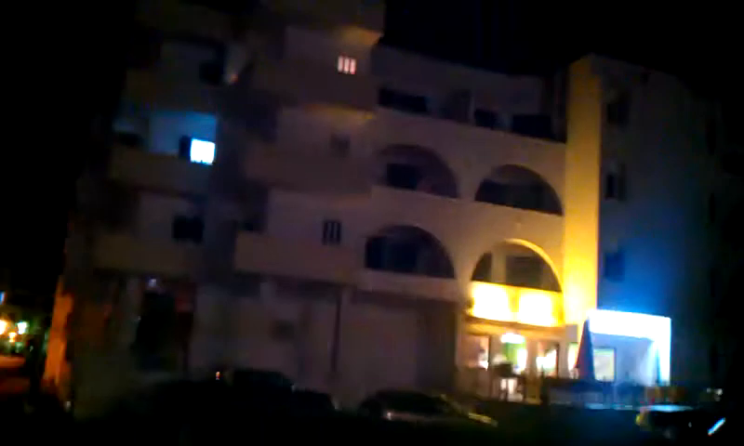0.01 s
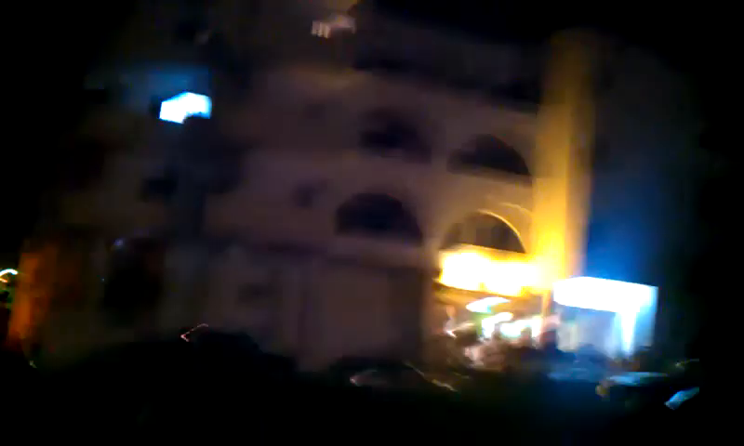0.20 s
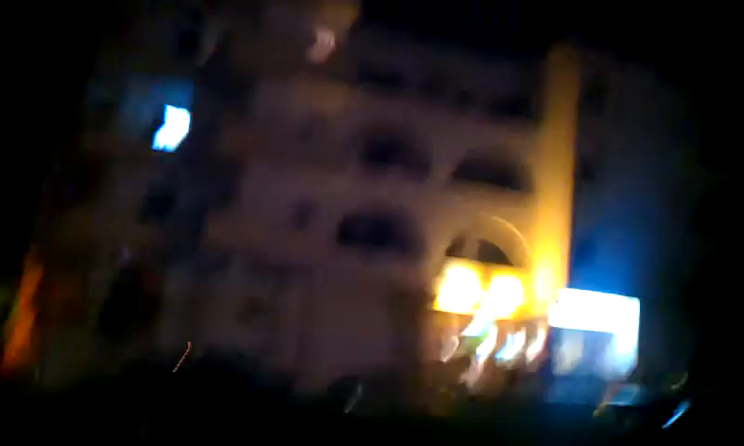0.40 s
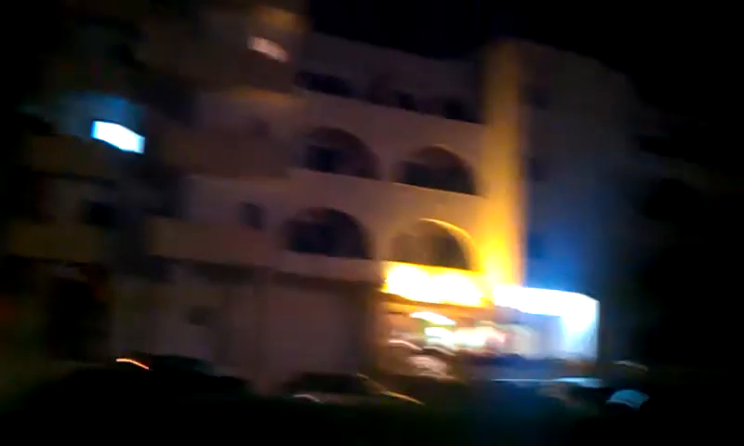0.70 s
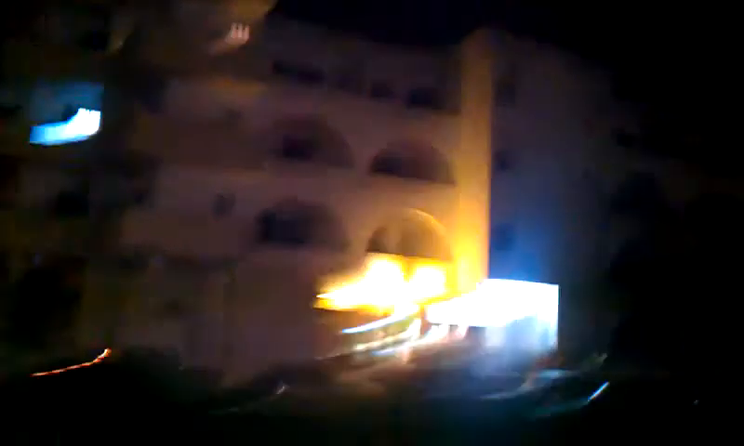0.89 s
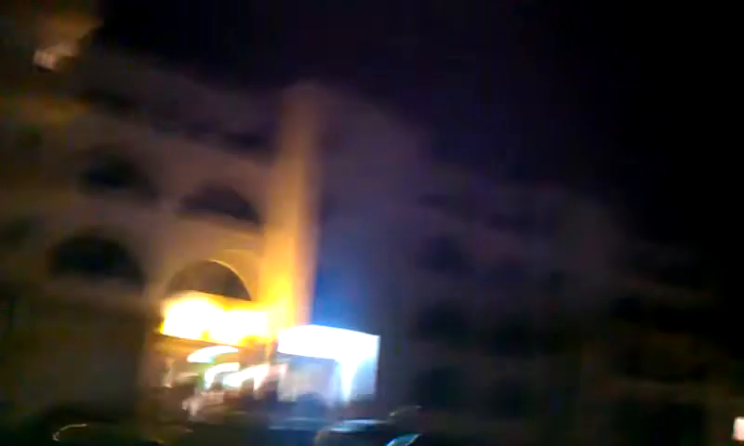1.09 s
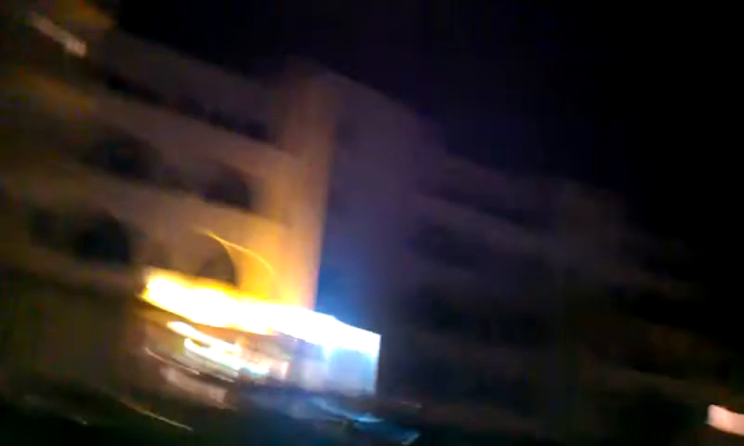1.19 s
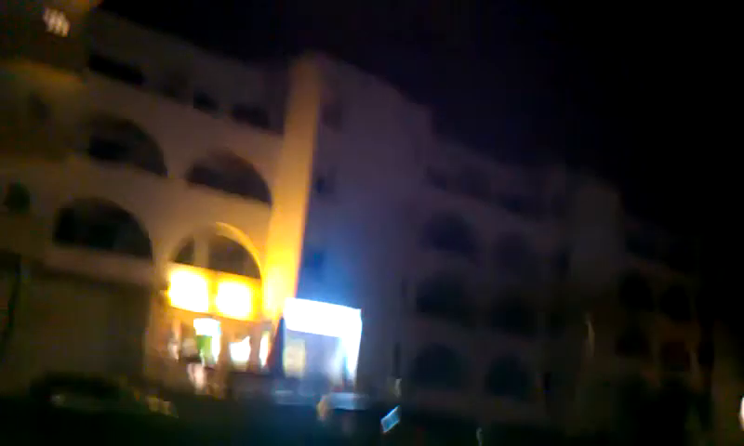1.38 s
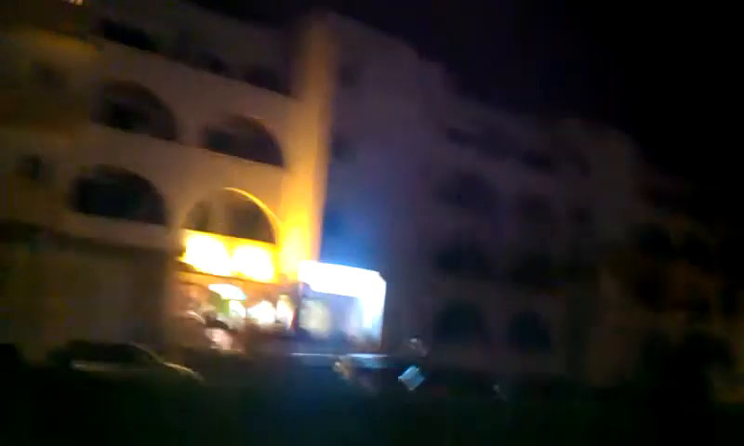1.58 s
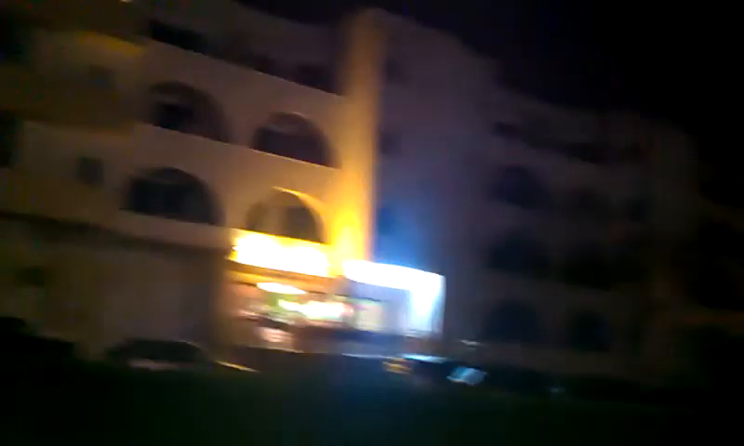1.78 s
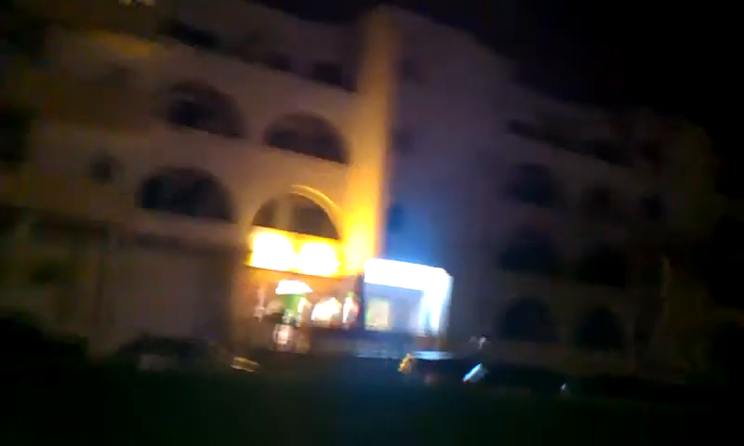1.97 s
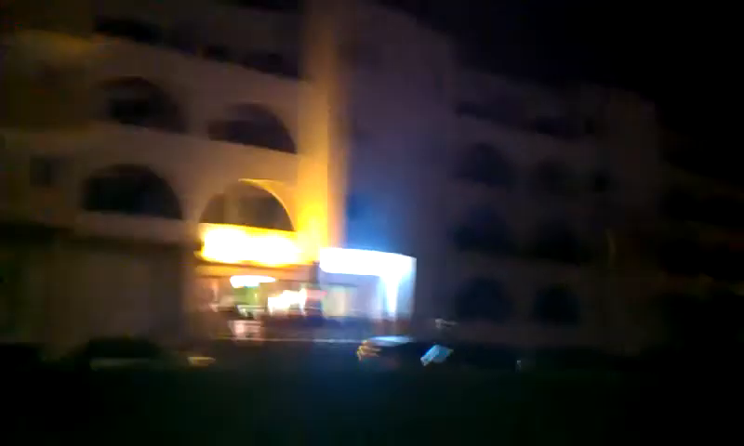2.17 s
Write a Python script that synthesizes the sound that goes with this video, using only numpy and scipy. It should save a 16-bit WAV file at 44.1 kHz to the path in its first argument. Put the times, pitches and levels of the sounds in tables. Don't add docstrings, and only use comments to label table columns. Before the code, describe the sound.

Continuous high, fast-pulsing cricket song outdoors at night over soft town wash and mono microphone hiss; fingers on the camera shell make sharp early snaps, sparse ticks, then a late crackling cluster.

```python
import sys
import numpy as np
from scipy import signal
from scipy.fft import rfft, irfft
from scipy.io import wavfile
from scipy.ndimage import uniform_filter1d

SR = 44100
rng = np.random.default_rng(int(sys.argv[2]) if len(sys.argv) > 2 else 0)


def store_wav(level_fs):
    pcm = np.round(np.clip(np.atleast_2d(level_fs), -1, 1) * 32767)
    wavfile.write(sys.argv[1], SR, pcm.T.astype(np.int16))


def invert_db(level):
    return 10 ** (np.asarray(level, dtype=float) / 20)


N = 97020


def curve(table):
    return np.interp(np.arange(N) / SR, *np.array(table, float).T[:2])


def unit(x):
    return x / np.sqrt(np.mean(x ** 2))


def ring(x, hz, width_hz):
    return signal.lfilter(*signal.iirpeak(hz, hz / width_hz, fs=SR), x)


def ringing_noise(hz, width_hz, second_hz, second_width_hz):
    return unit(ring(ring(rng.standard_normal(N), hz, width_hz), second_hz, second_width_hz))


def walk(rate):
    hold = int(SR / rate)
    steps = np.repeat(rng.standard_normal(N // hold + 1), hold)
    return 1.6 * uniform_filter1d(uniform_filter1d(steps, hold), hold)[:N]


def add(out, s, sound, db):
    i = int(s * SR)
    out[i:i + len(sound)] += (invert_db(db) * sound / np.abs(sound).max())[:N - i]


def trill(beat, wing_hz, pulse_s, scatter_hz):
    edge_s, jitter_s = .0035, .00004
    length_scatter, level_scatter_db = .11, 1.0
    sag_hz_per_s = -3500
    t = np.arange(N) / SR
    stroke = np.round(beat).astype(int)
    chance = rng.standard_normal((120, 4))
    centre = np.interp(np.arange(120), beat, t) + jitter_s * chance[:, 0]
    u = t - centre[stroke]
    half = pulse_s / 2 * (1 + length_scatter * chance[stroke, 1])
    shape = np.sin(np.pi / 2 * np.clip((half - np.abs(u)) / edge_s + .5, 0, 1)) ** 2
    turns = (wing_hz + scatter_hz * chance[stroke, 2]) * u + sag_hz_per_s / 2 * u ** 2
    return unit(shape * invert_db(level_scatter_db * chance[stroke, 3]) * np.sin(2 * np.pi * turns))


def near_cricket():
    # t/s, lead over an even beat [strokes]
    stroke_drift = [(0, .1), (.2, 0.095), (.3, 0.013), (.7, -0.16), (1.0, -0.1), (1.1, 0.0043), (1.5, .08),
                    (1.7, -0.034), (1.9, 0.068), (2.2, -0.066)]
    # t/s, level/dB
    song_level = [(0, -54), (.3, -52.5), (.5, -53.5), (.7, -52), (.77, -55), (1.0, -54.5), (1.2, -53),
                  (1.31, -54), (1.42, -51.5), (1.62, -54), (1.76, -52), (1.82, -53), (2.0, -57), (2.2, -52)]
    stroke_hz, first_stroke = 42.0715, -.238
    echo_s, echo_db = .012, -11
    beat = stroke_hz * np.arange(N) / SR + first_stroke + curve(stroke_drift)
    song = trill(beat, wing_hz=3200, pulse_s=.0095, scatter_hz=9)
    walls = rng.standard_normal(4000) * np.exp(-np.arange(4000) / SR / echo_s)
    echo = unit(signal.fftconvolve(song, walls)[:N])
    return (song + invert_db(echo_db) * echo) * invert_db(curve(song_level))


def far_cricket():
    # t/s, level/dB
    far_level = [(0, -65), (.3, -67), (.5, -65.5), (.85, -66.5), (1.3, -68), (1.7, -67.5), (2.2, -67)]
    stroke_hz, first_stroke, wing_hz = 49.15, .052, 3534
    blur_db = 0.5
    beat = stroke_hz * np.arange(N) / SR + first_stroke + 0.0536 * walk(6.6)
    strokes = trill(beat, wing_hz, pulse_s=0.005, scatter_hz=41.2)
    blur = ringing_noise(wing_hz - 60, 430, wing_hz - 60, 400)
    return (strokes + invert_db(blur_db) * blur) * invert_db(curve(far_level))


def ticks():
    # t/s of the peak, peak level/dB, ring f/Hz, share of the shell's lower ring/dB
    tick_events = [(0.0077, -27.5, 8000, -35), (0.0133, -29.5, 7060, -16.5), (0.046, -34.5, 6700, -31),
                   (0.0494, -38, 8600, -23), (0.1034, -39, 8000, -17), (0.2022, -32.5, 8400, -14),
                   (0.8511, -36, 7200, -23), (0.922, -32.5, 7130, -25), (1.1595, -32.5, 8350, -36),
                   (1.2604, -36, 7400, -20), (1.306, -33.5, 8300, -26), (1.3149, -28, 7700, -9.5),
                   (1.3563, -42, 8700, -12), (1.423, -32, 7660, -7), (1.4515, -39, 8800, -7),
                   (1.821, -25.5, 7150, -13.5), (1.8238, -36, 8040, -4), (1.836, -36, 8100, -20),
                   (1.8526, -27, 8000, -27), (1.8608, -42, 8700, -14), (1.8749, -24.5, 6600, -9),
                   (1.8812, -20.5, 7450, -20), (1.8854, -39, 7100, -11), (1.9064, -34, 8000, -12),
                   (1.9101, -32, 7800, -5), (1.9383, -29, 7600, -21), (1.9425, -27.5, 7400, -34),
                   (2.002, -33.5, 8100, -14), (2.0178, -35, 8100, -19), (2.0515, -39, 7150, -1.5)]
    decay_ms, port_width_hz = .7, 1600
    shell_hz, shell_width_hz = 4200, 1800
    out = np.zeros(N)
    ms = np.arange(300) / SR * 1000
    for s, db, hz, shell_db in tick_events:
        scrape = rng.standard_normal(len(ms)) * np.exp(-ms / decay_ms)
        port = ring(ring(scrape, hz, port_width_hz), hz, 2800)
        shell = ring(ring(scrape, shell_hz, shell_width_hz), shell_hz, 6000)
        start = s - .0003
        add(out, start, port, db)
        add(out, start, shell, db + shell_db + 7)
    return out


def snaps():
    # t/s, peak level/dB, ring f/Hz, ring t60/ms
    snap_events = [
        (.2251, -15.5, 8000, 7.6),
        (.2446, -3, 7600, 1.1),
    ]
    broad_db = -1.5
    out, push = np.zeros(N), signal.unit_impulse(3000)
    for s, db, hz, ms in snap_events:
        click = ring(ring(ring(push, hz, 8000), hz, 8000), hz, 10000)
        add(out, s, ring(click, hz, 2200 / ms) * 3 + invert_db(broad_db) * click, db)
    return out


def knocks():
    # t/s, peak level/dB, ring f/Hz, ring t60/ms
    knock_events = [(.2252, -31.5, 910, 9.6), (0.225, -38, 3040, 1.6), (.2447, -33.5, 770, 4.1),
                    (.896, -39, 727, 11), (.896, -35.5, 1990, 4.6), (1.7974, -35, 705, 4.7),
                    (1.800, -39.5, 350, 11)]
    out, push = np.zeros(N), signal.unit_impulse(3000)
    for s, db, hz, ms in knock_events:
        body = ring(push, hz, 2200 / ms)
        add(out, s, ring(ring(body, hz, 4.4 * hz), hz, 2 * hz), db)
    return out


def thumps():
    # t/s, peak level/dB, swing f/Hz
    jolts = [(0.2245, -47.5, 110), (.244, -43, 150), (0.247, -54, 30), (0.422, -48.5, 75)]
    out, push = np.zeros(N), signal.unit_impulse(3000)
    for s, db, hz in jolts:
        add(out, s, ring(ring(push, hz, hz), hz, 2 * hz), db)
    return out


def rubbing():
    # t/s, level/dB
    rub_level = [(0, -55), (.07, -66), (.195, -60), (.228, -52), (.2435, -36), (.246, -65), (1.24, -60),
                 (1.265, -55.5), (1.33, -57), (1.46, -60), (1.795, -71), (1.815, -44), (1.89, -47),
                 (1.955, -54), (1.97, -67), (2.05, -48), (2.07, -66), (2.2, -60)]
    grains_per_s, spread_db, uneven_db = 3900, 2, 2.5
    port_hz, port_width_hz, body_db = 7900, 1530, -3
    grains = (rng.random(N) < grains_per_s / SR) * invert_db(spread_db * rng.exponential(size=N))
    friction = signal.lfilter([1], [1, -.95], grains) * rng.standard_normal(N)
    port = ring(ring(friction, port_hz, port_width_hz), port_hz, 4000)
    shell = ring(ring(friction, 4530, 6400), 4400, 9000) + 0.88 * ring(friction, 1580, 2100)
    return unit(port + invert_db(body_db) * shell) * invert_db(curve(rub_level) + uneven_db * walk(80))


def car():
    # t/s, level/dB of the tyres
    car_fade = [(0, -52), (.3, -58), (.6, -68.5), (1.2, -71), (2.2, -71)]
    tyres = ringing_noise(1350, 680, 1350, 1360)
    engine = ringing_noise(620, 230, 600, 530)
    return tyres * invert_db(curve(car_fade)) + engine * invert_db(curve(car_fade) - 6.5)


def town():
    # f/Hz, level/dB per Hz
    town_colour = [(30, -8), (58, -4), (260, -1), (420, -6), (1200, -9), (2700, -14.5), (4800, -10),
                   (16000, -28.5)]
    town_db, swell_db, flicker_db = -51.5, .25, .5
    f = np.fft.rfftfreq(N, 1 / SR) + 1
    hz, db = np.transpose(town_colour)
    wash = rfft(rng.standard_normal(N)) * invert_db(np.interp(np.log(f), np.log(hz), db))
    out, swell = np.zeros(N), walk(4.5)
    place = 2 * np.log2(f / 20)
    for band in range(21):
        share = np.clip(1 - np.abs(place - band), 0, 1)
        out += irfft(wash * share, N) * invert_db(swell_db * swell + flicker_db * walk(8.72))
    return unit(out) * invert_db(town_db)


def port_hiss():
    hiss_db, flicker_db = -58, .5
    return ringing_noise(8000, 1680, 8000, 3360) * invert_db(hiss_db + flicker_db * walk(6.7))


def scene():
    crickets = near_cricket() + far_cricket()
    handling = ticks() + snaps() + knocks() + thumps() + rubbing()
    background = car() + town() + port_hiss()
    return np.tile(crickets + handling + background, (2, 1))


def treble_gate(x, top_hz):
    holes_from_hz, hole_db = 10500, -1.7
    f, _, z = signal.stft(x, SR, nperseg=2048)
    power = uniform_filter1d(np.abs(z) ** 2, size=7, axis=-2)
    power = uniform_filter1d(power, size=2, axis=-1)
    bar_db = hole_db - 2.2 * np.clip((holes_from_hz - f) / 1500, 0, 1) + 9 * (f > top_hz)
    usual = np.median(power, axis=-1, keepdims=True)
    keep = power > usual * invert_db(bar_db)[:, None] ** 2
    untouched = (f < 2300)[:, None]
    return signal.istft(z * (keep | untouched), SR, nperseg=2048)[1][:, :N]


def low(x, hz):
    return signal.sosfiltfilt(signal.butter(16, hz, fs=SR, output="sos"), x)


def low_pass(x):
    return signal.sosfilt(signal.butter(12, 16850, fs=SR, output="sos"), x)


def record(dry):
    top_hz, over_top_db = 15750, -14
    below = low(dry, top_hz)
    shaded = below + invert_db(over_top_db) * (low(dry, top_hz + 800) - below)
    return low_pass(treble_gate(shaded, top_hz))


dry = scene()
out = record(dry)
store_wav(out)
```